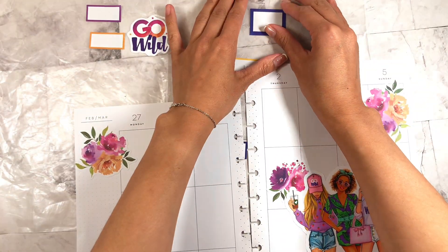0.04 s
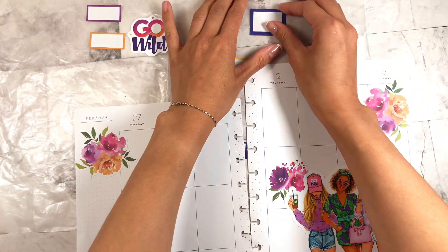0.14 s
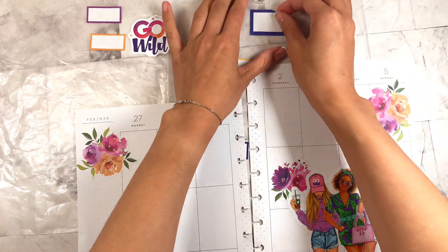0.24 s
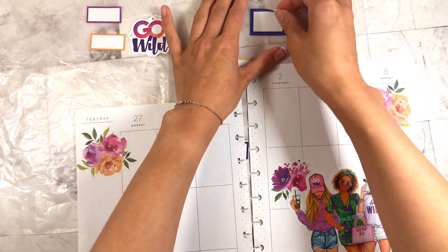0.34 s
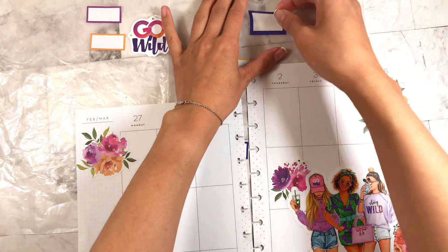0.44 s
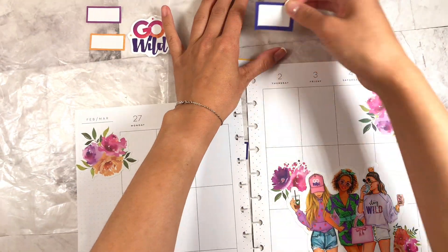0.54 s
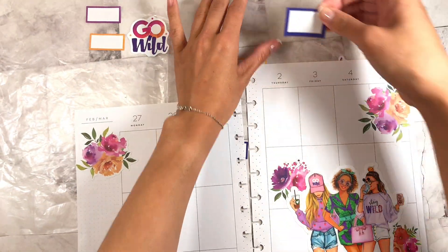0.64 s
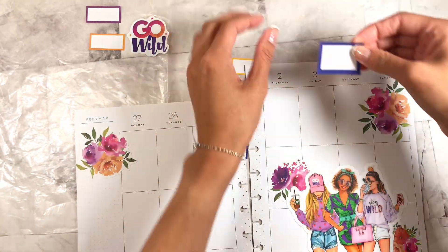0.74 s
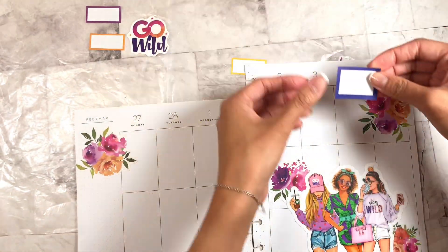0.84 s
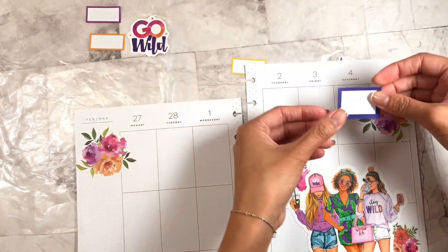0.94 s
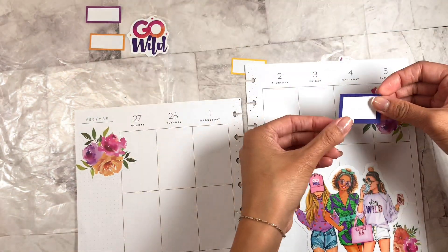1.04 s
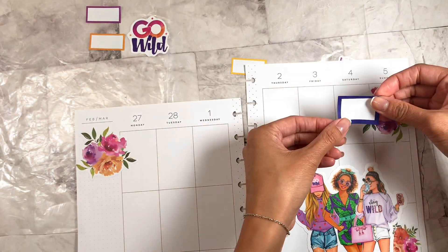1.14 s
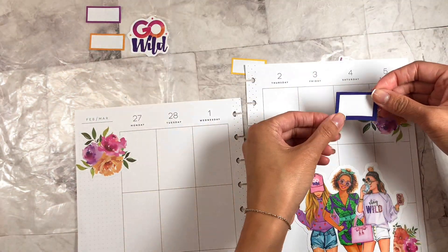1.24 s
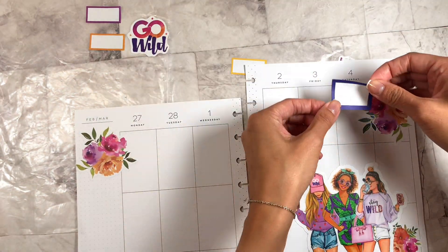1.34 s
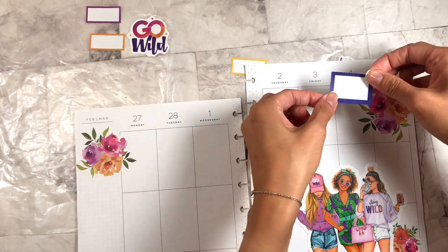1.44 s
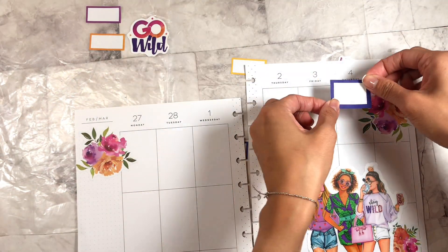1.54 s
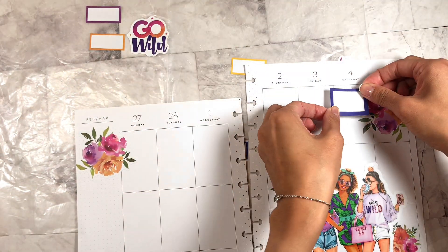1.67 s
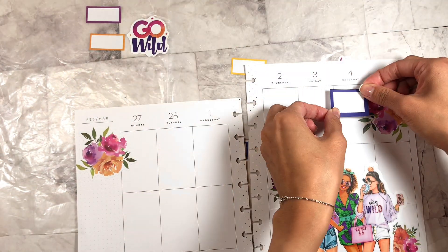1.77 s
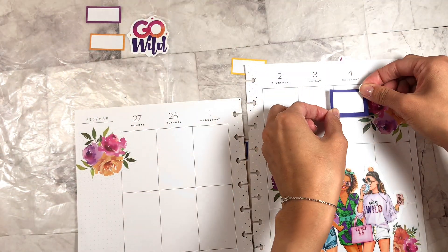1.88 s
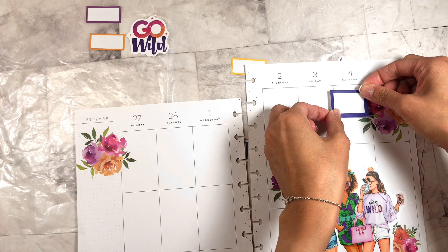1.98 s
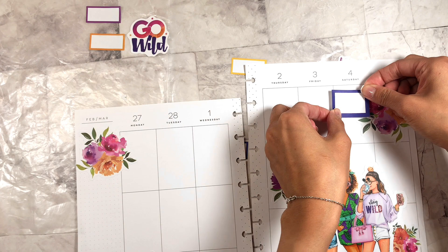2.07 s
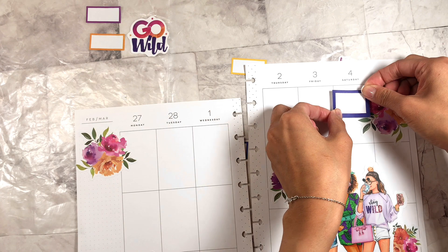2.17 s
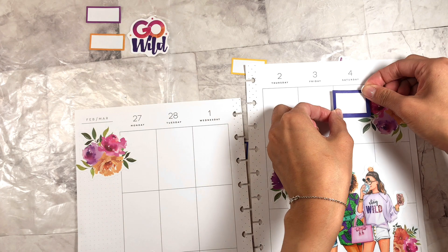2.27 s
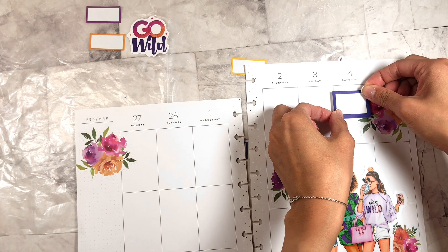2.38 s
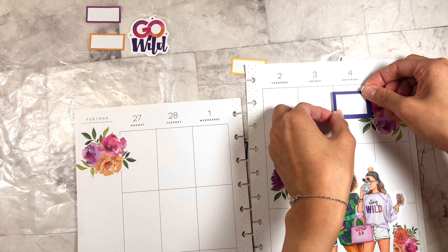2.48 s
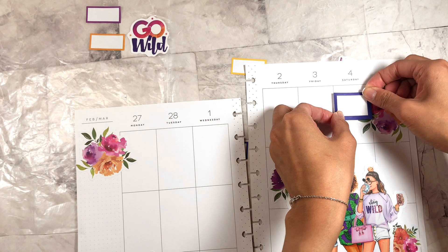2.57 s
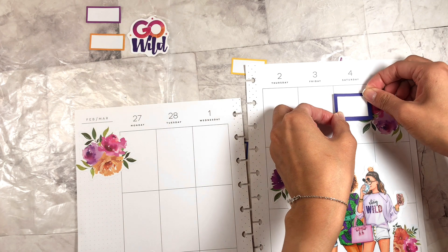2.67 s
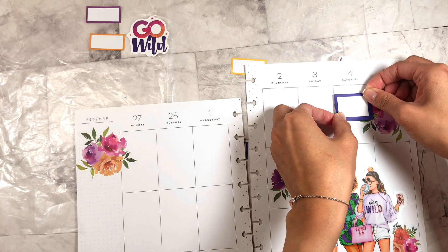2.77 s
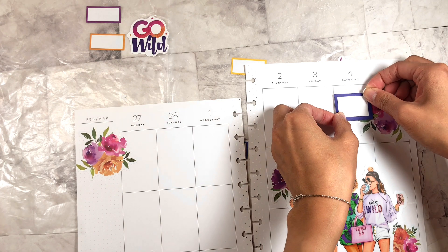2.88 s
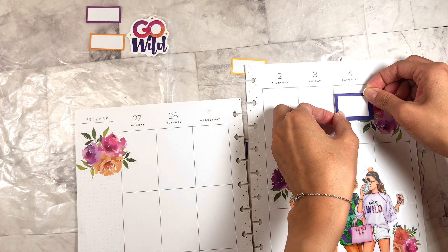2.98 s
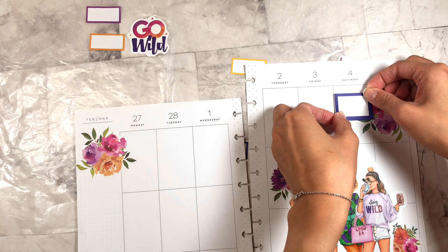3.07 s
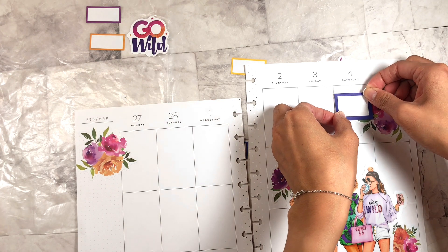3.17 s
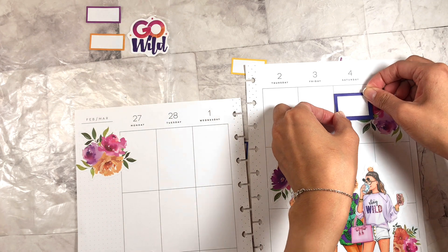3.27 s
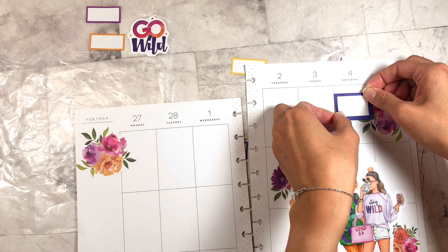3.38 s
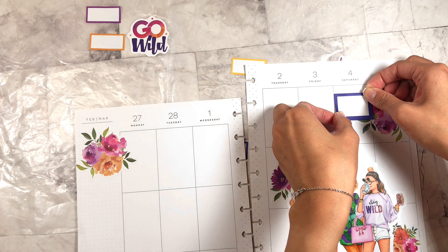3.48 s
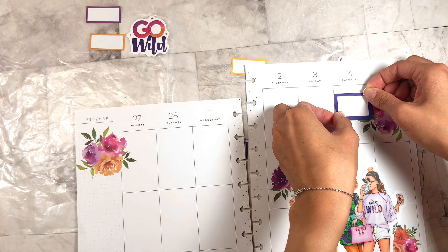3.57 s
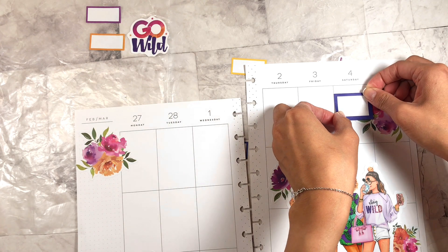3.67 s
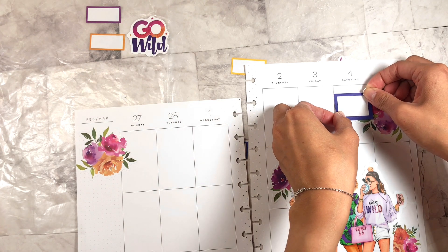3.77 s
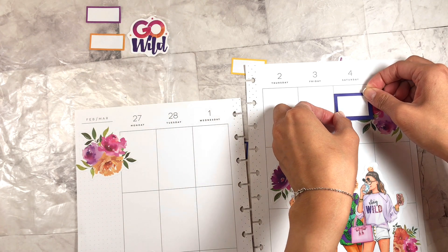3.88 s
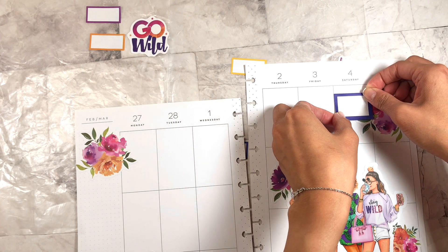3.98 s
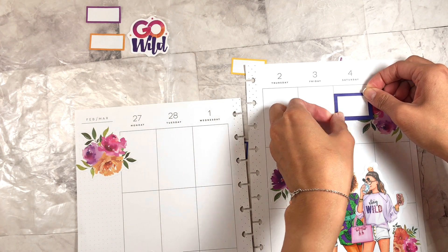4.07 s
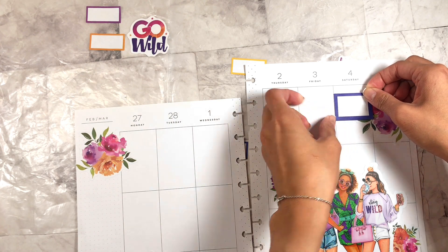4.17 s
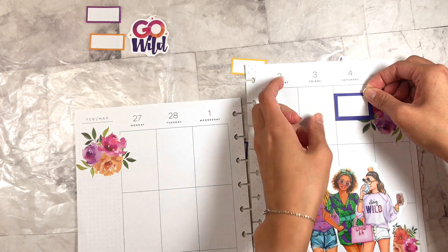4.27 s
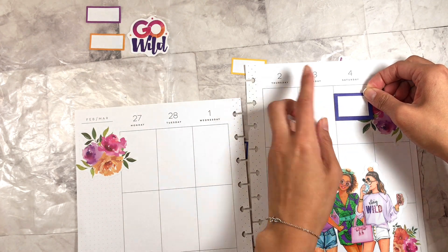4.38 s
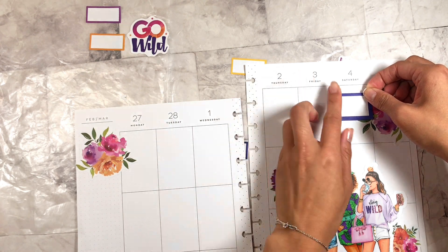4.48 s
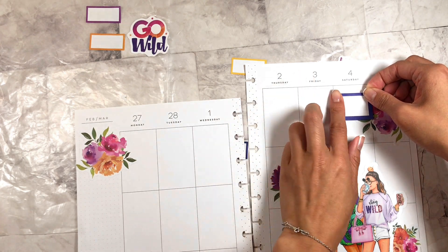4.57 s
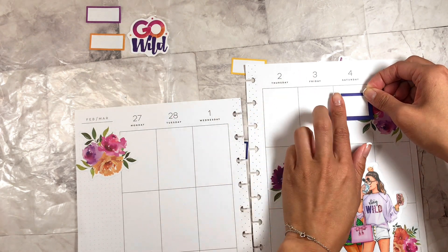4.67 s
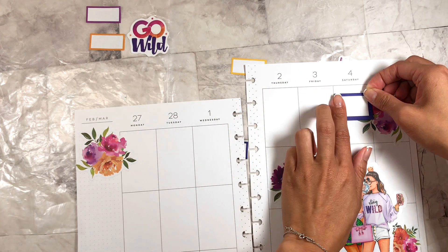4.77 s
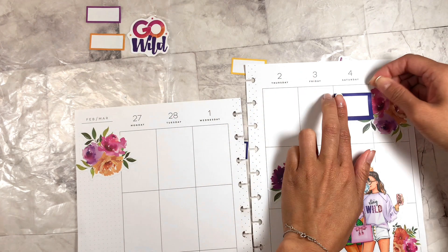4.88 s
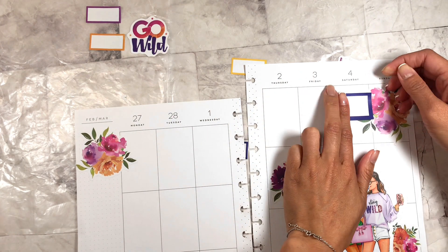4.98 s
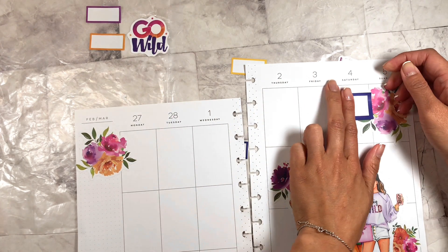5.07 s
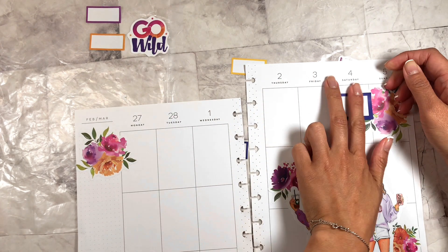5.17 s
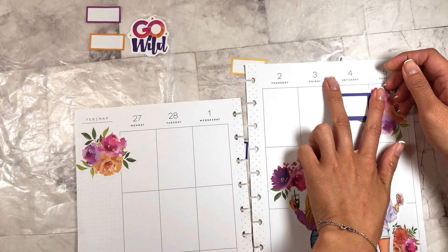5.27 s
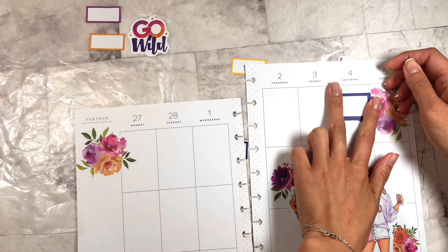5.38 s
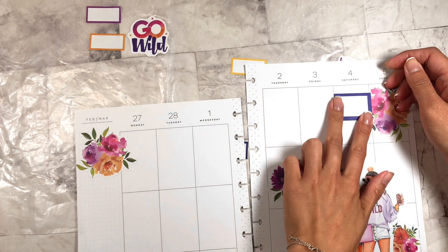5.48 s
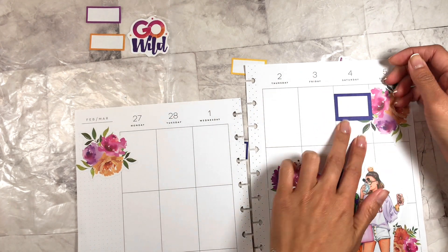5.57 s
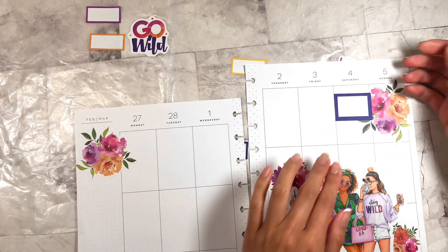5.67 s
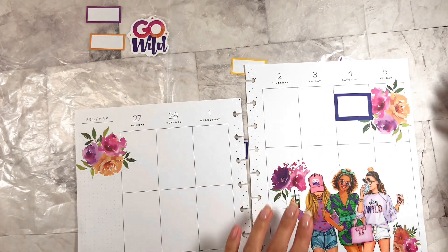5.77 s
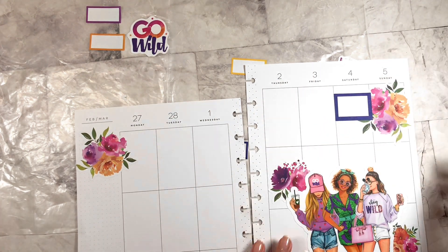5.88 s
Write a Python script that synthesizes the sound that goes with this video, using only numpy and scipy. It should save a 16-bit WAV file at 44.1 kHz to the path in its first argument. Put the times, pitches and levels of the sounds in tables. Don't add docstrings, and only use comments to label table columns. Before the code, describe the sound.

Close, dry paper crackles rise to a short sharp peel, followed by sparse ticks, near silence, and gentle finger rubbing on paper.

```python
import sys
import numpy as np
from scipy import signal
from scipy.fft import rfft, irfft
from scipy.io import wavfile
from scipy.ndimage import uniform_filter1d

SR = 44100
rng = np.random.default_rng(int(sys.argv[2]) if len(sys.argv) > 2 else 0)


def int16_out(signal):
    q = np.round(np.clip(np.atleast_2d(signal).T, -1, 1) * 32767)
    wavfile.write(sys.argv[1], SR, q.astype(np.int16))


def convert_level_to_amplitude(level_db):
    exponent = np.asarray(level_db, float) / 20
    return 10 ** exponent


N = 261513


def evened(x):
    return x / np.sqrt(np.mean(x ** 2) + 1e-20)


def read(points, hz):
    f, value = np.transpose(points)
    return np.interp(np.log(hz + 1), np.log(f + 1), value)


def add(mix, start_s, sound):
    part = mix[round(start_s * SR):][:len(sound)]
    part += sound[:len(part)]


def resonate(x, hz, width_hz):
    return signal.lfilter(*signal.iirpeak(hz, hz / width_hz, SR), x)


def band(x, lo_hz, hi_hz):
    return signal.sosfilt(signal.butter(N=3, Wn=[lo_hz, hi_hz], btype="band", fs=SR, output="sos"), x)


def coloured(points):
    hz = np.fft.rfftfreq(N, 1 / SR)
    return evened(irfft(rfft(rng.standard_normal(N)) * convert_level_to_amplitude(read(points, hz)), N))


def ramp(start_s, end_s, first_db, last_db, edge_db_per_s):
    t = np.arange(N) / SR
    outside_s = np.maximum(np.maximum(start_s - t, t - end_s), 0)
    return np.interp(t, [start_s, end_s], [first_db, last_db]) - edge_db_per_s * outside_s


def background():
    # freq_hz, level_db_per_hz
    air_spectrum = [(15, -49.5), (25, -19.5), (43, 0.5), (66, 0.5), (84, -13), (120, -1.5), (363, -12),
                    (463, -13), (677, -17.5), (1650, -25.5), (9570, -29), (14800, -37), (16000, -48)]
    # freq_hz, width_hz, level_db
    hum = [(58.15, 21, -70.5), (111.4, 22, -73.5)]
    # centre_s, lift_db, width_s
    leans = [
        (.42, 12, .12),
        (1.3, 7.5, 0.3115),
        (1.7, 10.5, 0.061),
        (2.2, 6, 0.36),
        (2.86, 5.5, 0.058),
        (3.8, 2, .25),
        (4.14, 8.5, 0.042),
        (4.9, 9.5, 0.084),
        (5.2, 2, 0.16),
        (5.56, 7, 0.068),
    ]
    air_db, rumble_db = -68.5, -73
    air = convert_level_to_amplitude(air_db) * coloured(air_spectrum)
    for hz, width_hz, db in hum:
        drone = resonate(rng.standard_normal(N), hz, width_hz)
        air += convert_level_to_amplitude(db) * evened(resonate(drone, hz, width_hz))
    low = signal.lfilter(*signal.butter(N=2, Wn=250, fs=SR), air)
    t = np.arange(N) / SR
    lift_db = sum(db * np.exp(-((t - s) / width_s) ** 2) for s, db, width_s in leans)
    return air - low + evened(low) * convert_level_to_amplitude(rumble_db + lift_db)


def room(x):
    # freq_hz, t60_s
    decay = [(500, 0.26), (2000, 0.13), (6000, 0.15), (14000, 0.12)]
    taps = rng.standard_normal(SR // 2) * (np.arange(SR // 2) > 250)
    hz, t, z = signal.stft(taps, SR, nperseg=256)
    fade = convert_level_to_amplitude(-60 * t / read(decay, hz)[:, None])
    tail = signal.istft(z * fade, SR, nperseg=256)[1]
    return signal.fftconvolve(x, tail / np.linalg.norm(tail))[:N]


def table_shake():
    # freq_hz, width_hz, level_db
    modes = [(534, 50, -1.5), (878.5, 170, -3.5), (430, 60, -6.5)]
    # start_s, end_s, first_db, last_db
    tugs = [
        (.03, .33, -69, -73),
        (.345, .44, -61, -60),
        (.455, .505, -54, -52.5),
    ]
    settle_db_per_s = 299
    db = np.max([ramp(*tug, settle_db_per_s) for tug in tugs], axis=0)
    push = rng.standard_normal(N)
    top = sum(convert_level_to_amplitude(mode_db) * evened(resonate(push, hz, width_hz)) for hz, width_hz, mode_db in modes)
    return (convert_level_to_amplitude(-3.5) * evened(band(push, 200, 420)) + top) * convert_level_to_amplitude(db)


def hand_bumps():
    # start_s, peak_db, pitch_hz, t60_s
    hits = [(.09, -61, 544, 0.17), (.34, -62, 550, 0.28), (1.37, -53, 1312, 0.17),
            (1.371, -54.5, 1420, 0.2), (1.676, -52, 114, 0.4), (2.201, -59, 117, 0.26),
            (2.431, -57, 110.4, 0.152), (2.82, -57.5, 109.5, 0.13), (3.874, -59, 220, 0.065),
            (3.866, -61, 900, .04), (4.135, -51.5, 320, 0.032), (4.868, -50, 262, 0.052),
            (5.634, -32.5, 302, 0.013)]
    out, t = np.zeros(N), np.arange(16000) / SR
    for s, db, hz, t60_s in hits:
        onset = 1 - np.exp(-t / 0.0022)
        add(out, s, convert_level_to_amplitude(db - 60 * t / t60_s) * onset * np.sin(2 * np.pi * hz * t))
    return out


def rubbing():
    # start_s, end_s, first_db, last_db, dull_lift_db
    strokes = [(0, 0.202, -68, -59, -11.5), (0.2, .25, -55.5, -51, -16.5), (.26, 0.326, -58, -50.5, -19),
               (0.545, .62, -53, -63, -14), (.62, 0.65, -71, -63, -13), (0.703, .76, -69.5, -70.5, -11),
               (1.084, 1.098, -81.5, -83, 13), (1.18, 1.28, -77, -72, -1), (1.651, 1.749, -76, -77.5, -6.5),
               (4.057, 4.196, -76, -70.5, -15), (4.235, 4.273, -68.5, -68, -21),
               (4.29, 4.38, -74, -76.5, -18), (4.44, 4.518, -73.5, -78, -13),
               (4.551, 4.555, -65, -76, -11.5), (4.697, 4.864, -67.5, -73, -12.5),
               (4.954, 5.184, -64, -62, -15), (5.2, 5.243, -58.5, -55.5, -24),
               (5.233, 5.303, -57, -59.5, -15.5), (5.325, 5.494, -64, -56.5, -18.5),
               (5.508, 5.63, -57, -57.5, -18), (5.695, 5.697, -67, -69.5, -13)]
    # freq_hz, level_db_per_hz
    skin = [(1350, -43), (2300, -15), (2600, -10.5), (3230, -8.5), (4370, -4.5), (7280, -4.5), (8160, -5),
            (14500, -19), (16000, -23.5)]
    slow = evened(uniform_filter1d(rng.standard_normal(N), size=150))
    grit = convert_level_to_amplitude(1.9 * rng.standard_normal(N) + 0.6 * slow)
    hz, t, z = signal.stft(coloured(skin) * grit, SR, nperseg=256)
    patches = uniform_filter1d(rng.standard_normal(z.shape), size=2, axis=0)
    patches = evened(uniform_filter1d(patches, size=70, axis=1))
    scrape = evened(signal.istft(z * convert_level_to_amplitude(1.6 * patches), SR, nperseg=256)[1][:N])
    bright = signal.lfilter(*signal.butter(N=1, Wn=8000, btype="high", fs=SR), scrape)
    dull = evened(band(rng.standard_normal(N) * grit, 800, 2100))

    lift_db_per_s = 450
    levels_db = np.array([ramp(*row[:4], lift_db_per_s) for row in strokes])
    db = levels_db.max(0)
    dull_db = np.array(strokes)[levels_db.argmax(0), 4]
    bright_db = 1.5 + 0.14 * (np.maximum(db, -85) + 65)
    return convert_level_to_amplitude(db) * (scrape + convert_level_to_amplitude(dull_db) * dull + (convert_level_to_amplitude(bright_db) - 1) * bright)


def scuffs():
    # start_s, end_s, level_db, pitch_hz
    drags = [
        (1.08, 1.094, -65, 2240),
        (1.18, 1.28, -80, 5200),
        (4.256, 4.28, -65.5, 5200),
        (4.493, 4.51, -71, 3530),
        (4.538, 4.558, -72, 4900),
    ]
    relative_width, edge_db_per_s = 0.12, 1500
    slow = evened(uniform_filter1d(rng.standard_normal(N), size=90))
    grit = rng.standard_normal(N) * convert_level_to_amplitude(2.8 * slow)
    out = np.zeros(N)
    for start_s, end_s, db, hz in drags:
        squeak = evened(resonate(grit, hz, relative_width * hz))
        out += convert_level_to_amplitude(ramp(start_s, end_s, db, db - 1, edge_db_per_s)) * squeak
    return out


def snaps(rows, t60_s, bright_db, own_db, width_hz, sheet_db, crack_db, after_db, thud_db, creep_db):
    # freq_hz, width_hz, level_db
    sheet = [(3395, 440, -0.5), (4620, 940, -0.5), (6180, 450, 3.5), (8200, 2200, -3), (11710, 2533, -33)]
    creep_s, creep_db_per_s = .006, 5000
    out, t = np.zeros(N), np.arange(2000) / SR - creep_s
    chance = rng.standard_normal((len(rows), 2, len(t)))
    for (s, db, hz, dull_db), (noise, size) in zip(rows, chance):
        spray = noise * convert_level_to_amplitude(3.5 * size)
        dying = convert_level_to_amplitude(-60 * t / max(t60_s, .002)) + convert_level_to_amplitude(after_db - 60 * t / 0.08)
        spray *= np.where(t < 0, convert_level_to_amplitude(creep_db + creep_db_per_s * t), dying)
        spray[np.argmax(t >= 0)] = convert_level_to_amplitude(crack_db)

        ring = convert_level_to_amplitude(own_db) * resonate(spray, hz, width_hz * hz / 6000) + convert_level_to_amplitude(-21.5) * spray
        for k, (mode_hz, mode_width_hz, mode_db) in enumerate(sheet):
            sign = (-1) ** k
            ring += sign * convert_level_to_amplitude(sheet_db + mode_db) * resonate(spray, mode_hz, mode_width_hz)
        ring = evened(band(ring, min(2300, 0.61 * hz), 11930))

        dull = evened(band(spray, 1450, 2600)) + convert_level_to_amplitude(thud_db) * evened(band(spray, 420, 1000))
        fizz = evened(resonate(band(spray, 9110, 17000), 10500, 4009))
        fizz_db = bright_db + 3.2 * np.log2(hz / 6000)
        snap = ring + convert_level_to_amplitude(dull_db) * dull + convert_level_to_amplitude(fizz_db) * fizz
        peak = np.sqrt(2 * uniform_filter1d(snap ** 2, size=20).max())
        add(out, s - creep_s, convert_level_to_amplitude(db) * snap / peak)
    return out


def with_dull(rows, dull_db):
    dull_per_db, usual_db = -0.4339, -30
    return [(s, db, hz, dull_db + dull_per_db * (db - usual_db)) for s, db, hz in rows]


def followers(rows):
    delay_s, drop_db, spread_db, pitch_hz = .0026, -7, 2.5, 6130
    chance = np.clip(rng.standard_normal((len(rows), 3)), -2, 2)
    out = []
    for (s, db, hz), (a, b, c) in zip(rows, chance):
        late_s = s + delay_s * (1 + .15 * a)
        out.append((late_s, db + drop_db + spread_db * b, pitch_hz * (1 + 0.051 * c)))
    return out


def pressing():
    # start_s, peak_db, loudest_ring_hz, dull_share_db
    grips = [(2.1556, -54, 6570, -10), (2.1866, -59.5, 5160, -11), (2.8016, -59.5, 4720, -16),
             (3.8622, -56.5, 2600, 0), (3.8821, -53.5, 3720, -1.5), (4.0775, -61.5, 3170, -11),
             (4.1198, -40.5, 6650, -26), (4.2319, -54, 6720, -25), (4.2804, -46.5, 5800, -23),
             (4.433, -51, 4968, -18), (4.4935, -57.5, 3530, -3.5), (4.5425, -52, 7880, -6),
             (4.5633, -62, 4780, -12), (4.6836, -64, 3240, -14), (4.8198, -53, 9560, -22),
             (4.8395, -42.5, 4240, -18), (4.8711, -46, 8700, -15), (4.8736, -43, 8600, -13),
             (4.8765, -29, 7150, -14), (4.878, -31, 3720, -24), (4.8886, -51, 5000, -5),
             (5.0256, -59, 7800, -20), (5.6397, -41.5, 10250, -28), (5.6414, -39.5, 10290, -34),
             (5.6964, -48, 6720, -28), (5.7848, -58.5, 6400, -12)]
    return snaps(grips, t60_s=0.012, bright_db=-8.5, own_db=7, width_hz=1400, sheet_db=-21,
                 crack_db=20.5, after_db=-29, thud_db=-12, creep_db=-10.5)


def carrying():
    # start_s, peak_db, loudest_ring_hz, dull_share_db
    touches = [(.5197, -41, 6500, 1), (.5281, -42.5, 7066, -15), (.5707, -38, 8310, -20),
               (.6394, -47.5, 9050, -15), (.6512, -51, 6140, -14), (.6813, -55, 9000, -11),
               (.7015, -60, 4950, -4), (.8792, -56, 4000, -11), (.8892, -36, 3970, -6),
               (.8915, -38, 7500, -7), (.8978, -50, 1593, 1), (1.027, -63.5, 7500, -12.5),
               (1.0859, -55, 2290, -8.5), (1.1044, -56, 5040, -4), (1.328, -61, 5240, -8),
               (1.358, -42.5, 6470, -2), (1.3605, -41, 6700, -15.5), (1.3635, -39.5, 4300, -10),
               (1.3668, -22.5, 6800, -5), (1.3686, -25, 6620, -2.5), (1.37, -30.5, 3300, -5),
               (1.3737, -38.5, 1523, 12), (1.6542, -58, 3786, -16), (1.6677, -54, 3370, -7)]
    return snaps(touches, t60_s=.011, bright_db=-11.5, own_db=9, width_hz=1700, sheet_db=-21,
                 crack_db=15.5, after_db=-26.5, thud_db=-12.0, creep_db=-14)


def picking():
    # start_s, peak_db, loudest_ring_hz
    picks = [(.0109, -43, 6600), (.0262, -51, 4910), (.0316, -44, 7190), (.052, -66, 3000),
             (.1165, -43, 6000), (.1195, -45, 10120), (.1294, -15.5, 9010), (.137, -29.5, 7300),
             (.1682, -52, 5800), (.1733, -40, 6196), (.1863, -41.5, 6200), (.1944, -41, 5920),
             (.2072, -35.5, 6080), (.2142, -32, 8110), (.2185, -39.5, 9016), (.2225, -40, 9040),
             (.226, -35.5, 8530), (.2292, -19, 8930), (.2417, -33, 9186), (.248, -43, 9000),
             (.2528, -40, 7340), (.271, -37.5, 8293), (.282, -44.5, 4478), (.2942, -33, 10280),
             (.3071, -34.5, 9046), (.3134, -35.5, 3512), (.318, -44.5, 8000), (.328, -39, 3983),
             (.3301, -35, 8840)]
    return snaps(with_dull(picks, dull_db=-20), t60_s=0.015, bright_db=-7.5, own_db=7.5, width_hz=1700,
                 sheet_db=-4.5, crack_db=23, after_db=-22.5, thud_db=-14, creep_db=-8)


def ripping():
    # start_s, peak_db, loudest_ring_hz
    slips = [(.3373, -13.5, 6090), (.3463, -20, 6100), (.3556, -15, 6000), (.3592, -20.5, 6147),
             (.3692, -19, 5982), (.376, -17, 6034), (.3889, -21, 4806), (.3955, -14.5, 5938),
             (.3997, -20.5, 5866), (.4032, -21.5, 5940), (.4089, -11, 6020), (.413, -14.5, 5845),
             (.4183, -16, 7782), (.427, -13.5, 5778), (.4312, -13.5, 5780), (.4402, -13, 4603),
             (.446, -13, 5610), (.4503, -13.5, 5730), (.4609, -17.5, 5054), (.4653, -19, 5690),
             (.469, -18.5, 6680), (.4719, -16.5, 4660), (.4757, -12, 6337), (.4826, -11, 11650),
             (.4867, -17.5, 6583), (.4914, -11.5, 5744), (.496, -10, 5790), (.5024, -14, 6395),
             (.507, -16, 7950), (.5115, -27, 5329)]
    rows = with_dull(slips + followers(slips), dull_db=-16.0)
    return snaps(rows, t60_s=0.012, bright_db=-9.0, own_db=5.0, width_hz=170, sheet_db=-1.0,
                 crack_db=18.5, after_db=-20.5, thud_db=-12.5, creep_db=-21.5)


def scene():
    close = table_shake() + hand_bumps() + rubbing() + scuffs()
    close += pressing() + carrying() + picking() + ripping()
    return (background() + convert_level_to_amplitude(-15.0) * room(close) + close)[None]


def roll_off(x):
    return signal.sosfilt(signal.butter(12, 16520, fs=SR, output="sos"), x)


def record(dry):
    edge = signal.firwin(numtaps=255, cutoff=15900, fs=SR)
    heard = signal.oaconvolve(band(dry, 28, 20000), edge[None], "same")
    return roll_off(heard)


dry = scene()
out = record(dry)
int16_out(out)
```